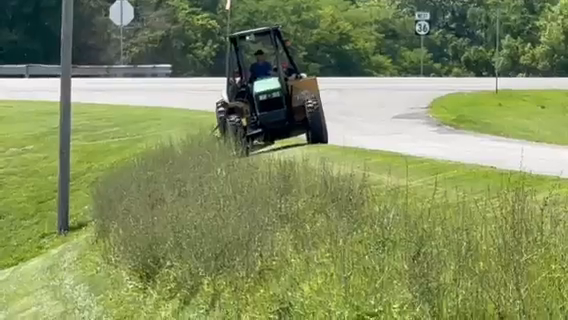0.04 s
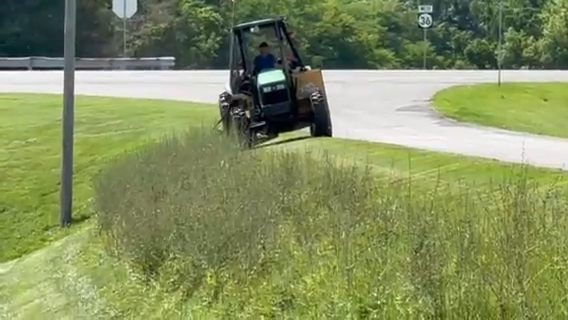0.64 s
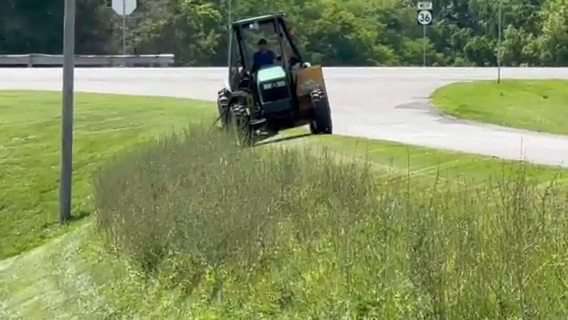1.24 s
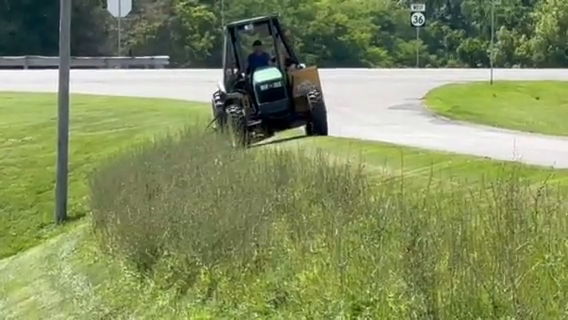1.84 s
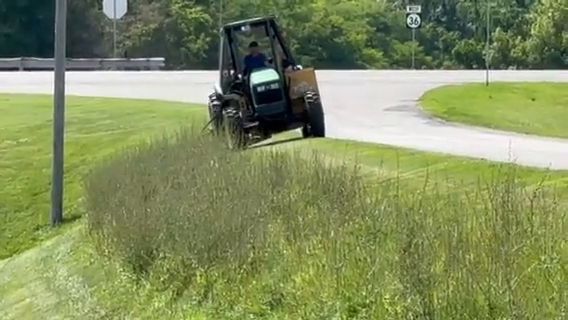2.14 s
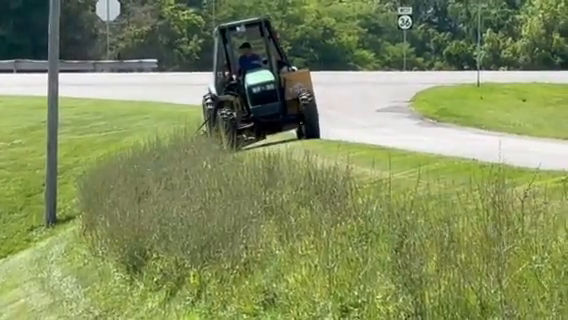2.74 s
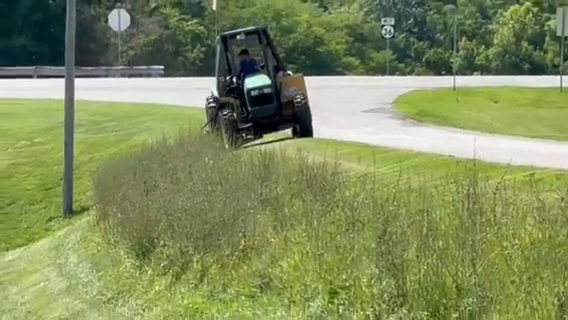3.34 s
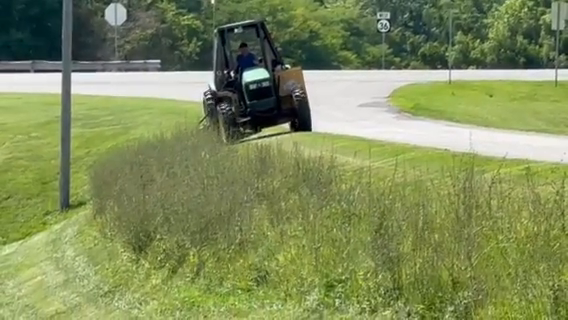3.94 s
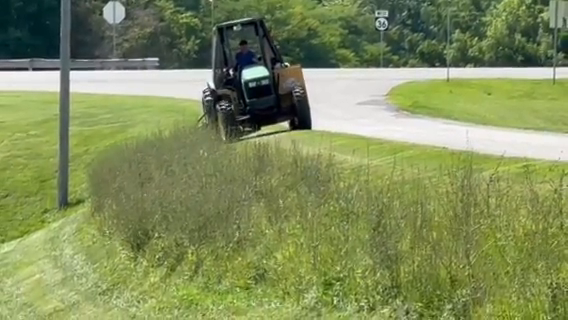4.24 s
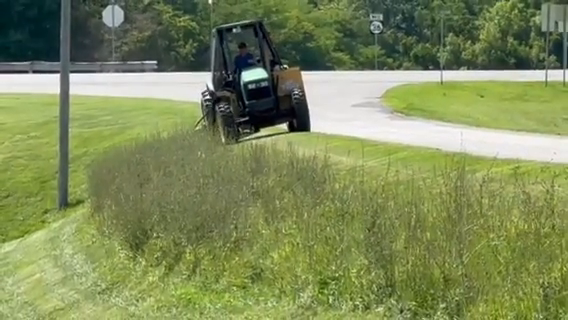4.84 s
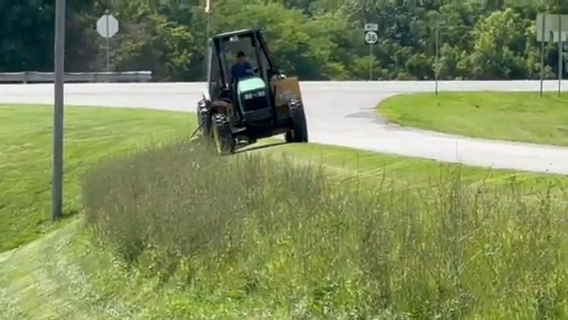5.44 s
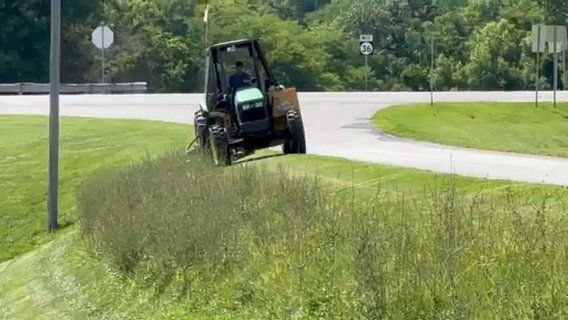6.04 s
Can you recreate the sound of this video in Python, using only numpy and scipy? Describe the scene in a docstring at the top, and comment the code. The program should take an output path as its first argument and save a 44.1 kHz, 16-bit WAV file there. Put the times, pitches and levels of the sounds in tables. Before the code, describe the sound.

Outdoors, some way off, a diesel tractor holds a steady working speed, with engine clatter, a low exhaust roar and a thin, high whine. Its mower rattles through tall grass, rasping on clump after clump and clinking on woody stems, more often in the second half. Gusts of wind thump and rumble right on the microphone, strongest about two seconds in. Near the end a low hum swells and fades.

```python
"""Tractor mowing a verge

Some way off, a diesel tractor holds working speed: firings knock the block over the exhaust roar,
while fan, hydraulic pump and mower drive whine. The boom mower rattles through tall grass, rasps
on each clump and clinks on woody stems. A gusty breeze buffets the microphone. A faint sizzle
sits on top, and late on a low hum swells and fades."""
import sys
import numpy as np
from scipy.fft import rfft, irfft, next_fast_len
from scipy.io import wavfile
from scipy.ndimage import map_coordinates

SR = 44100
rng = np.random.default_rng(int(sys.argv[2]) if len(sys.argv) > 2 else 0)


def dump(signal):
    """Clip the signal to [-1, 1] and save it as 16-bit WAV at the path in sys.argv[1]."""
    limited = np.clip(np.atleast_2d(signal).T, -1, 1)
    pcm = np.round(limited * 32767).astype(np.int16)
    wavfile.write(sys.argv[1], SR, pcm)


N = 268569
TIME = np.arange(N) / SR

# fader ride of the engine clatter: t/s, relative level/dB
CLATTER_RIDE = [(0, -47), (1, -48), (2, -46), (2.7, -44.5), (3.3, -45), (3.85, -44.5), (4.7, -47),
                (5.4, -44.5), (6.09, -45.5)]
# resonances of the engine block and covers: f/Hz, width/Hz, level/dB
BLOCK_MODES = [(607, 100, -8.5), (741.6, 47, 0.5), (871.5, 89, 1.5), (984, 130, 0.5), (1118, 180, -0.5),
               (1517, 145, -7.5), (1908, 16, -5.5), (2003, 23, -7.5), (2147, 30, -5), (2446, 150, -5)]
# colour of the exhaust roar: f/Hz, level/dB
EXHAUST_EQ = [(30, -17.5), (70, -7.5), (150, 0), (210, 4.5), (300, -3), (420, -6.5), (600, -6.5),
              (1100, -16.5), (1330, -15.5), (1700, -11), (2600, -15), (4000, -24.5), (9000, -65)]
# fader ride of the cooling fan: t/s, level/dB
FAN_RIDE = [(0, -55.5), (1.2, -53), (2, -54), (2.7, -53), (3.8, -51), (4.5, -56), (6.09, -57)]
# engine tones: multiple of the shaft speed, level/dB
ENGINE_TONES = [(2, -46.5), (4, -49), (7, -63), (20, -61), (28, -60.5)]
# hydraulic pump tones: multiple of the stroke rate, level/dB
PUMP_TONES = [(5, -54.5), (6, -62)]
# whine of the mower drive: t/s, f/Hz, thin tone level/dB, rough skirt level/dB
DRIVE_WHINE = [(0, 2062, -55, -65), (.6, 2064, -54, -66), (1.8, 2066, -62.5, -72), (2.4, 2064, -52, -54),
               (3.4, 2056, -56, -57), (4.4, 2062, -53.5, -59.5), (5.4, 2060, -53, -56),
               (6.09, 2051, -47, -50)]
# fader ride of the steady cutting: t/s, relative level/dB
CUTTING_RIDE = [(0.0, -51), (0.25, -51), (0.44, -47), (0.62, -50.5), (0.9, -50.5), (1.55, -51.5),
                (1.76, -53), (2.37, -49.5), (3.24, -51.5), (3.68, -49), (4.0, -51.5), (4.41, -49),
                (4.88, -49), (5.55, -48), (6.09, -47)]
# colour of snapping grass: f/Hz, level/dB
GRASS_EQ = [(500, -38), (1500, 0.5), (2500, 1.5), (3200, 1.5), (4400, 1), (5900, -1.5), (6900, -6.5),
            (7800, -12), (9500, -18.5), (11200, -18.5), (12300, -31), (13300, -28.5), (14300, -41),
            (16000, -54)]
# colour of chopped stalks: f/Hz, level/dB
STALK_EQ = [(500, 0.5), (1300, 0.5), (1900, 0.5), (3200, 0), (4500, 1), (5400, -0.5), (6600, -4),
            (7800, -12.5), (9500, -17), (11200, -17), (13500, -28), (15700, -46)]
# resonances of the steel blades and housing: f/Hz, width/Hz, level/dB
STEEL_MODES = [(1918, 44, 2), (1966, 32, 6), (2150, 67, 3.5), (2440, 135, 2.5), (2893, 96, -2.5),
               (3380, 250, 0), (4010, 130, -0.5), (4340, 190, 1.5), (4670, 180, -1.5), (5040, 110, 3.5),
               (5860, 110, -1.5), (6630, 140, -3.5), (6930, 150, -6)]
# the breeze between gusts: t/s, relative buffet level/dB, relative flutter level/dB
BREEZE_RIDE = [(0.0, -43, -40.5), (0.2, -43.5, -37.5), (0.51, -35.5, -37.5), (0.73, -36, -38.5),
               (1.59, -36.5, -38.5), (2.02, -27.5, -34), (2.34, -40.5, -39), (2.95, -42.5, -43.5),
               (4.24, -49, -44.5), (4.82, -43, -49.5), (5.12, -49.5, -41), (6.09, -42.5, -36.5)]
# colour of the wind's deep buffet: f/Hz, level/dB
BUFFET_EQ = [(20, -41.5), (35, -8.5), (52, 0), (80, 0.5), (100, 0.5), (140, -21), (400, -39.5),
             (2000, -100)]
# colour of the wind's quicker flutter: f/Hz, level/dB
FLUTTER_EQ = [(40, -35.5), (85, -24), (115, 0), (165, 1), (215, -4.5), (270, -14.5), (400, -32), (700, -41),
              (2000, -94.5)]
# gusts: peak t/s, half length/s, buffet boost/dB, flutter boost/dB
GUST_CUES = [(0.356, 0.13, 4, 2), (0.55, 0.046, 4, -1), (0.75, 0.037, -1, 8), (0.9, 0.034, 4.5, 3),
             (1.224, 0.019, 6, 4), (1.427, 0.049, 1.5, 5.5), (1.633, 0.073, 5, 2), (2.034, 0.13, 2.5, 3),
             (2.64, 0.067, 4.5, 3), (3.11, 0.1, 8.5, 3), (3.702, 0.063, 8, 7.5), (4.162, 0.052, 10, 6),
             (5.853, 0.14, 13, 4.5)]
# a thin, high sizzle: t/s, centre f/Hz, level/dB
SIZZLE_RIDE = [(0, 13200, -90), (2.0, 13200, -89), (2.4, 13100, -82), (3.0, 13150, -85), (3.42, 13000, -79),
               (3.8, 13200, -85), (5.3, 13250, -82), (5.8, 13450, -77), (6.09, 13400, -78)]
# the mower bites a clump: t/s, feeding time/s, level/dB, bright rasp over dull crunch/dB
CLUMP_CUES = [(0.239, 0.038, -39, -5), (0.649, 0.087, -44.5, -3), (0.714, 0.041, -40, -1),
              (0.799, 0.057, -50, 4), (1.006, 0.012, -49, -3), (1.058, 0.046, -47.5, -4),
              (1.395, 0.058, -41, -4), (1.852, 0.052, -43.5, -4), (2.035, 0.035, -44.5, -2.5),
              (2.187, 0.043, -42.5, -4), (2.375, 0.042, -42.5, -3), (2.515, 0.033, -43, -2),
              (2.729, 0.049, -41, -3.5), (2.904, 0.034, -39.5, -1), (3.258, 0.056, -40, -2.5),
              (3.612, 0.045, -42, 1), (3.784, 0.031, -42.5, 4), (4.018, 0.053, -40.5, -1.5),
              (4.211, 0.033, -40.5, 4), (4.35, 0.038, -43, 1), (4.376, 0.03, -37, 0),
              (4.604, 0.027, -52, 5), (4.715, 0.081, -45.5, 1), (4.942, 0.031, -38.5, 0),
              (5.174, 0.04, -44.5, 0.5), (5.308, 0.033, -40, 1.5), (5.792, 0.035, -38.5, -4),
              (5.963, 0.05, -41, -4.5)]
# colour of thick stems cracking: f/Hz, level/dB
CRACK_EQ = [(800, -27), (2000, -5), (6500, -9), (9000, -16.5), (11500, -13), (13500, -19.5), (15700, -30)]
# eddies thump the microphone: t/s, peak level/dB, f/Hz
EDDY_CUES = [(0.445, -21, 149), (0.54, -19.5, 210), (0.547, -14.5, 82), (0.649, -20, 141),
             (0.758, -20, 127), (1.091, -20.5, 138), (1.394, -21.5, 149), (1.423, -16.5, 121),
             (1.455, -19, 128), (1.622, -19, 124), (1.706, -22, 128), (1.889, -18, 152), (1.906, -14.5, 83),
             (1.934, -17.5, 112), (1.988, -11, 102), (2.03, -12, 138), (2.044, -18.5, 210),
             (2.071, -15, 114), (2.116, -15, 118), (2.158, -22, 136), (2.598, -24.5, 217),
             (2.612, -20.5, 110), (2.668, -28, 169), (2.681, -18.5, 240), (2.719, -23.5, 89),
             (2.831, -24, 162), (3.045, -24, 99), (3.097, -23.5, 100), (3.15, -22.5, 99),
             (3.657, -25.5, 170), (3.684, -18, 245), (3.693, -25, 120), (3.729, -28, 146),
             (4.146, -25, 278), (4.159, -23, 120), (4.191, -24.5, 232), (4.505, -23.5, 164),
             (4.594, -31.5, 220), (5.829, -19, 166), (5.846, -21, 108), (5.897, -18, 121),
             (5.951, -23, 127)]
# colour of an eddy's wake: f/Hz, level/dB
WAKE_EQ = [(60, -8), (200, 2), (420, -7), (600, -18), (1500, -64)]
# a blade hits a woody stem: t/s, ring f/Hz, relative level/dB
CLINK_CUES = [(0.746, 4480, -35), (2.051, 4130, -36.5), (2.384, 4410, -38), (2.721, 4240, -33),
              (2.743, 4370, -27.5), (2.771, 4450, -35), (2.8, 2170, -35), (2.906, 4000, -33),
              (2.914, 5050, -38), (2.925, 2170, -32), (3.617, 4570, -38), (3.644, 4240, -33),
              (3.785, 5900, -39), (3.810, 4250, -36), (4.042, 4200, -33), (4.234, 4700, -33),
              (4.378, 1880, -37), (4.381, 4200, -36), (4.392, 5960, -39), (4.399, 4700, -30),
              (4.621, 5943, -40), (4.712, 4270, -34), (4.738, 4740, -39), (4.76, 5930, -39),
              (4.782, 4220, -33.5), (4.791, 5900, -36), (4.926, 4300, -36.5), (4.941, 5850, -36),
              (4.962, 6200, -36), (4.971, 4240, -32.5), (5.183, 4850, -41), (5.185, 5930, -39),
              (5.322, 4650, -36), (5.366, 5840, -38), (5.582, 4400, -37), (5.719, 4510, -39.5),
              (5.79, 4390, -32), (5.812, 4140, -30), (5.981, 4000, -32.5)]
# modes of a blade: ratio to the ring frequency, level/dB
BLADE_MODES = [(1, 0), (1.055, -14), (.94, -12.5), (1.3, -10)]
# likeness of the two microphone ports: f/Hz, correlation
PORT_LIKENESS = [(60, .82), (300, .88), (1100, .94), (1350, .55), (1750, .62), (2100, .96), (2450, .99),
                 (2900, .92), (3300, .9), (4500, .988), (6200, .99), (6900, .88), (7450, .98), (8600, .98),
                 (9600, .8), (10600, .993), (11900, .995), (12600, .8), (14000, .97)]
# balance of the ports: f/Hz, left minus right level/dB
PORT_BALANCE = [(100, .7), (600, .5), (900, -.7), (1220, 2), (1480, -6), (2000, 0), (2400, 0), (2900, -3),
                (3650, 2), (4300, 0)]
# phase between the ports: f/Hz, lead of the left/rad
PORT_LEAD = [(1170, .05), (1320, -1.15), (1500, -.55), (1740, -1.35), (2150, -.05), (2650, .03),
             (2900, .65), (3500, 1.1), (3850, .4), (4170, .3), (4260, .02), (6220, 0), (6330, .35),
             (6780, .5), (7050, 1.2), (7450, 3.14), (8300, 6.15), (8800, 6.2), (10500, 3.35), (11300, 3.14),
             (12100, 2.9), (13600, 0)]


def amp(db):
    """Decibels to gain."""
    return 10 ** (np.asarray(db) / 20)


def unit(x):
    """Scale to rms 1."""
    return x / np.sqrt(np.mean(x ** 2) + 1e-20)


def along(points, hz):
    """(f/Hz, value) points read on a log axis."""
    f, values = np.transpose(points)
    return np.interp(np.log(hz + 1), np.log(f + 1), values)


def ride(rows, column=1):
    """One column of a timed table as automation, one value per sample."""
    columns = np.transpose(rows)
    return np.interp(TIME, columns[0], columns[column])


def wobble(rate):
    """A smooth random curve through rate points a second."""
    return map_coordinates(rng.standard_normal(int(N * rate / SR) + 4), [TIME * rate], mode="nearest")


def bell(t, half_length):
    """A smooth swell of height 1 around t = 0."""
    return np.exp(-(t / half_length) ** 2)


def filtered(x, response):
    """x through a complex frequency response."""
    size = next_fast_len(N + SR // 2)
    return irfft(rfft(x, size) * response(np.fft.rfftfreq(size, 1 / SR)), size)[..., :N]


def coloured(x, eq):
    """x through an EQ curve, rms 1."""
    return unit(filtered(x, lambda hz: amp(along(eq, hz))))


def ringing(x, modes):
    """x through a bank of resonances, rms 1."""
    def power(f):
        return sum(amp(2 * db) / (1 + (2 * (f - hz) / width) ** 2) ** 2 for hz, width, db in modes)
    return unit(filtered(x, lambda f: np.sqrt(power(f))))


def noise():
    """Two unrelated white noises."""
    return rng.standard_normal((2, N))


def smear(width_hz):
    """A complex envelope that blurs a tone into a band about width_hz wide."""
    return (wobble(width_hz) + 1j * wobble(width_hz)) / np.sqrt(2)


def noise_band(angle, width_hz):
    """Narrow noise centred on a running phase, rms 1."""
    return unit((smear(width_hz) * np.exp(1j * angle)).real)


def turning(hz):
    """The angle of something that turns hz times a second."""
    return 2 * np.pi * (np.cumsum(hz) / SR + rng.random())


def throb(angle, depth):
    """A gain that swells once a turn."""
    return unit(np.exp(depth * np.cos(angle)))


def snaps(per_s, scatter_db=0):
    """Two streams of random clicks, their sizes spread by scatter_db."""
    hits = rng.random((2, N)) < per_s / SR
    return unit(hits * np.sign(noise()) * amp(scatter_db * noise()))


def tones(angle, orders, flutter_db):
    """Harmonics of a rotation, each fluttering by itself in the moving air."""
    out = np.zeros(N)
    for order, db in orders:
        flutter = amp(flutter_db * wobble(9))
        out += amp(db) * unit(flutter * np.sin(order * angle + 2 * np.pi * rng.random()))
    return out


def spread(pair):
    """Two unrelated signals serve as mid and side for a partly alike left and right."""
    def weights(hz):
        width = np.arccos(np.clip(along(PORT_LIKENESS, hz), -1, 1)) / 2
        return np.array([np.cos(width), np.sin(width)])
    mid, side = filtered(pair, weights)
    return np.array([mid + side, mid - side])


def tractor():
    """Four cylinders knock the block twice a turn; fan, pump and drive sing over the exhaust."""
    shaft_hz, pump_hz, fan_order = 36.06, 198.3, 30
    shaft = turning(shaft_hz * (1 + 0.001356 * wobble(4)))
    pump = turning(pump_hz * (1 + 0.00281 * wobble(6) + 0.00444 * wobble(40)))
    # every firing, and more weakly every pump stroke, shakes the covers
    knocks = noise() * throb(2 * shaft, depth=.35) * throb(shaft, depth=.06) * throb(pump, depth=.15)
    clatter = amp(ride(CLATTER_RIDE) - 0.45 + .35 * wobble(8)) * ringing(knocks, BLOCK_MODES)
    roar_gain = amp(-42 + 0.73 * wobble(4.8))
    roar = roar_gain * coloured(noise() * throb(2 * shaft, depth=0.043), EXHAUST_EQ)
    fan = amp(ride(FAN_RIDE)) * tones(shaft, [(fan_order, 0)], flutter_db=1.2)
    body = spread(clatter + roar)
    whine = drive_whine(shaft)
    drone = tones(shaft, ENGINE_TONES, flutter_db=2)
    hydraulics = tones(pump, PUMP_TONES, flutter_db=2.5)
    return body + whine + fan + drone + hydraulics


def drive_whine(shaft):
    """The mower drive sings a thin tone in a rough skirt and buzzes a panel, pulsing with each firing."""
    panel_hz, panel_db = 2430, -7
    drive = turning(ride(DRIVE_WHINE) + 7 * wobble(40))
    skirt = noise_band(drive, width_hz=230)
    panel = amp(panel_db) * noise_band(2 * np.pi * panel_hz * TIME, width_hz=90)
    tone = amp(ride(DRIVE_WHINE, column=2)) * unit(np.sin(drive))
    buzz = amp(ride(DRIVE_WHINE, column=3)) * (skirt + panel)
    return throb(2 * shaft, depth=.45) * (tone + buzz)


def mower():
    """Spinning blades snap stalks: a thin, steady rattle and a rasp per clump, both ringing the steel."""
    rotor_hz, crossover_hz = 42, 3650
    rotor = turning(rotor_hz + 2 * wobble(4.9))
    grass = coloured(snaps(per_s=4500, scatter_db=1), GRASS_EQ)
    grass += amp(-7.5 + 3.6 * wobble(20)) * ringing(snaps(per_s=980), STEEL_MODES)
    stalks = coloured(snaps(per_s=2600), STALK_EQ)
    stalks += amp(-5.5 + 2.8 * wobble(30)) * ringing(snaps(per_s=1900, scatter_db=.5), STEEL_MODES)
    rattle_gain = amp(ride(CUTTING_RIDE) + 1.32 + 1.1 * wobble(25))
    rattle = rattle_gain * unit(grass) * throb(rotor, depth=0.053)
    crunch_gain, rasp_gain, crack_gain, ring = bites()
    dull = filtered(unit(stalks), lambda hz: 1 / (1 + (hz / crossover_hz) ** 8))
    bright = unit(stalks) - dull
    chopped = crunch_gain * dull + rasp_gain * bright
    stems = crack_gain * coloured(snaps(per_s=450, scatter_db=4), CRACK_EQ)
    ragged = amp(1.1 * wobble(190)) * throb(rotor, depth=0.13)  # stalks feed in unevenly
    return spread(rattle + ragged * chopped + stems) + ragged * ring


def wind():
    """Gusts ride on the breeze and hit the microphone in quick lumps: deep buffet, lighter flutter."""
    buffet_db = ride(BREEZE_RIDE) + 2
    flutter_db = ride(BREEZE_RIDE, column=2) + 1.5
    for start, half_length, buffet_boost, flutter_boost in GUST_CUES:
        swell = bell(TIME - start, half_length)
        buffet_db += buffet_boost * swell
        flutter_db += flutter_boost * swell
    lumps = throb(turning(17 + 7 * wobble(14)), depth=.55)
    buffet = amp(buffet_db) * coloured(noise() * lumps, BUFFET_EQ)
    flutter = amp(flutter_db) * coloured(noise() * lumps, FLUTTER_EQ)
    return spread(with_eddies(buffet + flutter))


def sizzle():
    """A faint, narrow band high in the treble wavers and grows."""
    return amp(ride(SIZZLE_RIDE, column=2)) * noise_band(turning(ride(SIZZLE_RIDE)), width_hz=500)


def bites():
    """Clumps feed in, then the chaff drains: envelopes for crunch, rasp and cracks, plus a steel ring."""
    rise_s, overshoot, overshoot_s, drain_s, crack_s = .002, .33, .015, .03, .03
    typical_db, ring_hz, drop_hz_per_db, scatter_hz = -40, 4910, 82.5, 204.4
    crunch_power, rasp_power, crack_gain, ring = np.zeros((4, N))
    blur = smear(width_hz=420)  # a hail of uneven blows blurs the ring
    for start, feed_s, db, bright_db in CLUMP_CUES:
        span = slice(round(start * SR), round(start * SR) + SR // 2)
        t = np.maximum(TIME[span] - start, 0)
        attack = (1 - np.exp(-t / rise_s)) * (1 + overshoot * np.exp(-t / overshoot_s))
        feed = amp(db) * attack * np.exp(-np.maximum(t - feed_s, 0) / drain_s)
        crunch_power[span] += (feed * amp(-bright_db / 2)) ** 2
        rasp_power[span] += (feed * amp(bright_db / 2)) ** 2
        # a heavier clump cracks its thick stems louder and rings the steel lower
        heavier_db = db - typical_db
        crack_gain[span] += amp(db + heavier_db - 12.5) * np.exp(-t / crack_s)
        hz = ring_hz - drop_hz_per_db * heavier_db + scatter_hz * rng.standard_normal()
        ring[span] += amp(bright_db - 13) * feed * (blur[span] * np.exp(2j * np.pi * hz * t)).real
    return np.sqrt(crunch_power), np.sqrt(rasp_power), crack_gain, ring


def with_eddies(rumble):
    """Each eddy ducks the rumble, lands a soft thump and drags a ragged wake, stronger if it is quick."""
    half_cycles, duck = 0.66, .8
    wake_db, wake_db_per_hz, wake_s = -24, 0.0329, 0.0095
    wake = coloured(noise(), WAKE_EQ)
    for peak_s, db, hz in EDDY_CUES:
        span = slice(round(peak_s * SR) - SR // 10, round(peak_s * SR) + SR // 10)
        t = TIME[span] - peak_s
        passing = bell(t, half_cycles / hz)
        rumble[:, span] *= 1 - duck * passing
        rumble[0, span] += amp(db) * passing * np.sin(2 * np.pi * (t * hz + rng.random()))  # mid only
        rumble[:, span] += amp(db + wake_db + wake_db_per_hz * hz) * bell(t, wake_s) * wake[:, span]
    return rumble


def clinks():
    """Woody stems strike the blades, each at another spot: a short, rough ring at its own pitch."""
    rise_s, decay_s, blur = .0005, .0055, .9
    out = np.zeros(N)
    rough = (1 + blur * smear(width_hz=900)) / np.hypot(1, blur)
    for start, hz, db in CLINK_CUES:
        span = slice(round(start * SR), round(start * SR) + SR // 10)
        t = np.maximum(TIME[span] - start, 0)
        modes = sum(amp(mode_db) * np.exp(2j * np.pi * (ratio * hz * t + rng.random()))
                    for ratio, mode_db in BLADE_MODES)
        envelope = (1 - np.exp(-t / rise_s)) * np.exp(-t / decay_s)
        out[span] += amp(db) * envelope * (rough[span] * modes).real
    return out


def hum():
    """A low tone of unsteady pitch and level comes in late, with a fast attack and a long tail."""
    start_s, rise_s, fade_s = 4.94, 0.014, 0.65
    pitch_hz, wander_hz, level_db = 153, 24, -33
    t = np.maximum(TIME - start_s, 0)
    swell = (1 - np.exp(-t / rise_s)) * np.exp(-t / fade_s)
    angle = turning(pitch_hz + wander_hz * wobble(70))
    waver = amp(2.5 * wobble(30))
    return amp(level_db) * swell * unit(waver * np.sin(angle))


def scene():
    """The mix: tractor and mower straight ahead, wind right on the microphone."""
    return tractor() + mower() + clinks() + wind() + hum() + sizzle()


def record(dry):
    """The two microphone ports differ in colour and phase; deepest rumble and extreme top are cut."""
    low_cut_hz, top_hz = 37, 15700
    sides = np.array([[1], [-1]])

    def response(hz):
        balance = amp(.5 * sides * along(PORT_BALANCE, hz))
        phase = np.exp(.5j * sides * along(PORT_LEAD, hz))
        low_cut = hz ** 3 / np.hypot(hz ** 3, low_cut_hz ** 3)
        return balance * phase * low_cut * (hz < top_hz)
    return filtered(dry, response)


dry = scene()
out = record(dry)
dump(out)
```